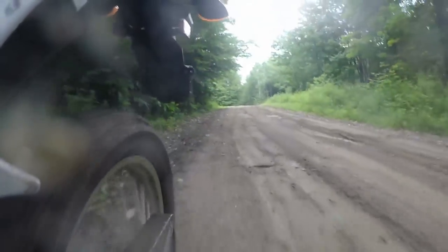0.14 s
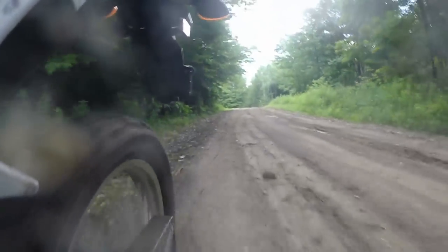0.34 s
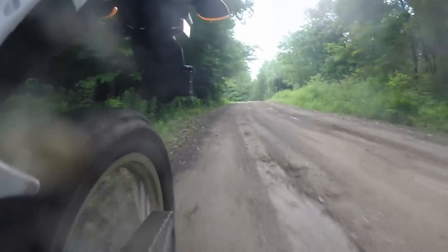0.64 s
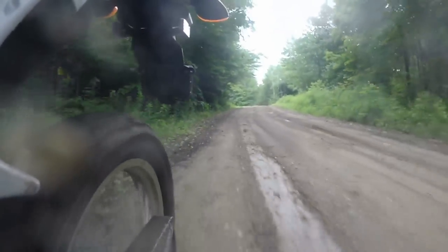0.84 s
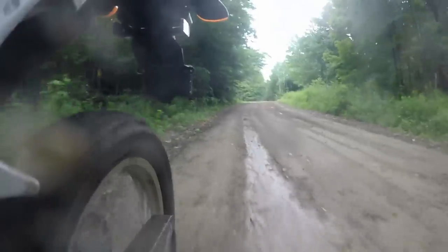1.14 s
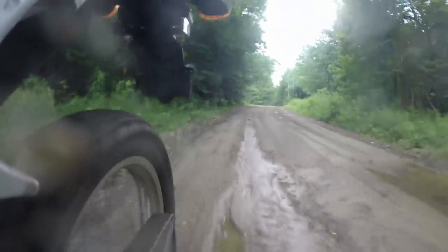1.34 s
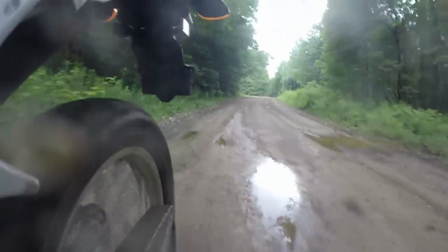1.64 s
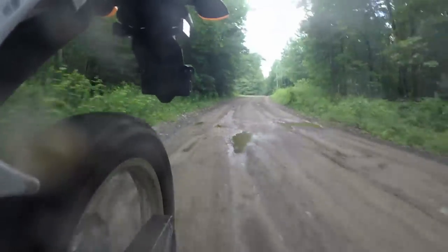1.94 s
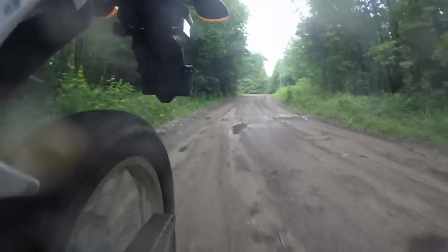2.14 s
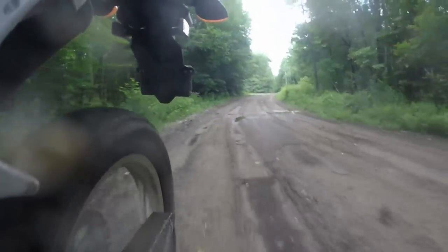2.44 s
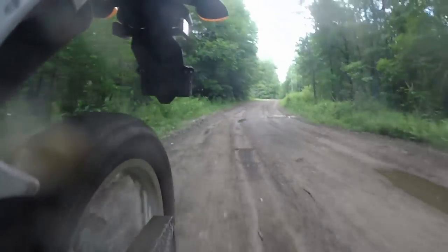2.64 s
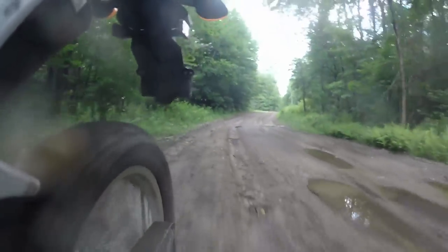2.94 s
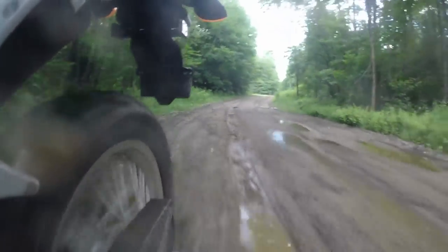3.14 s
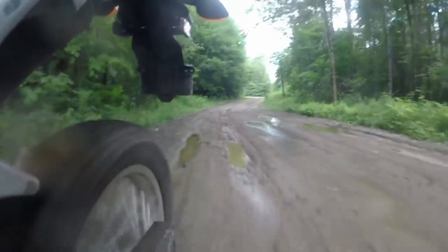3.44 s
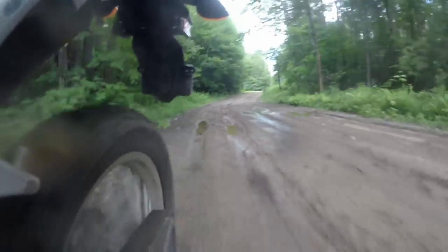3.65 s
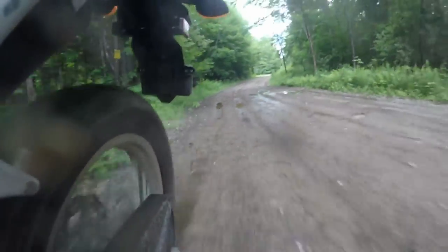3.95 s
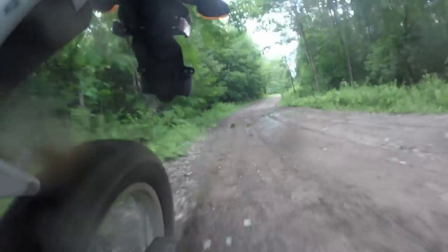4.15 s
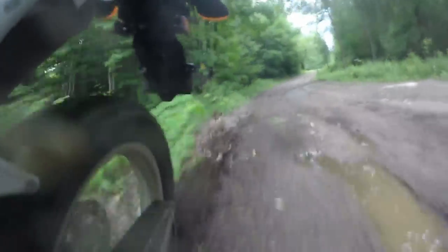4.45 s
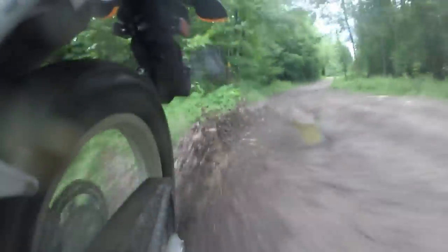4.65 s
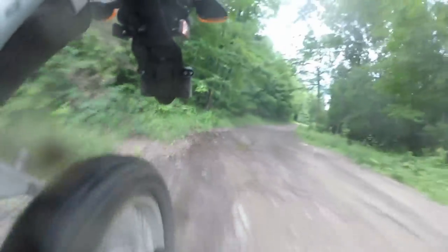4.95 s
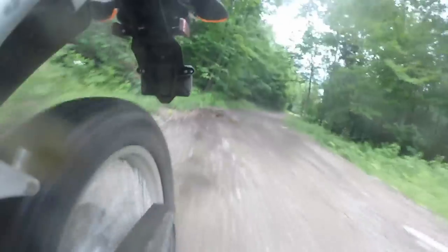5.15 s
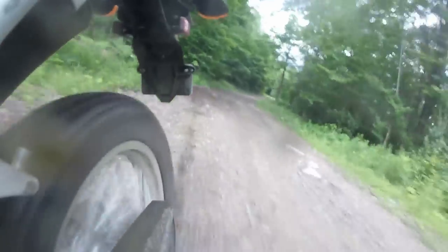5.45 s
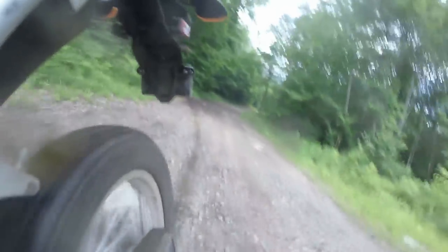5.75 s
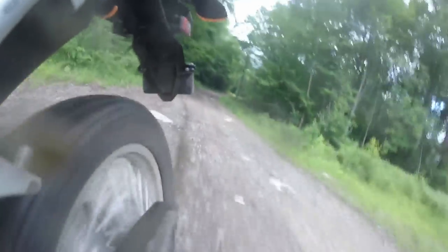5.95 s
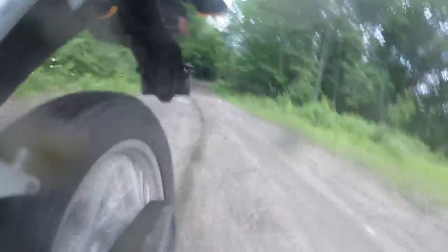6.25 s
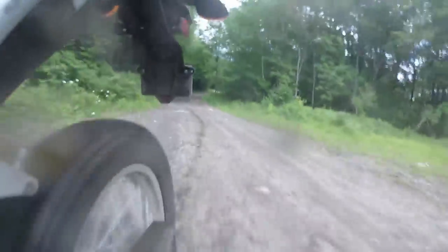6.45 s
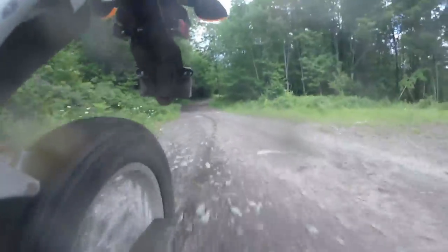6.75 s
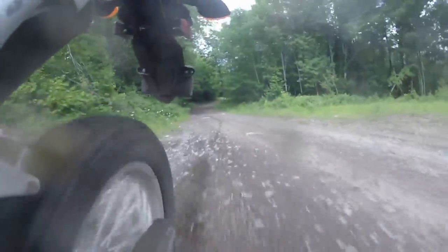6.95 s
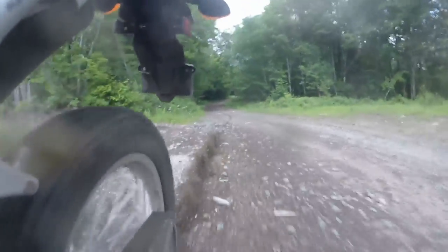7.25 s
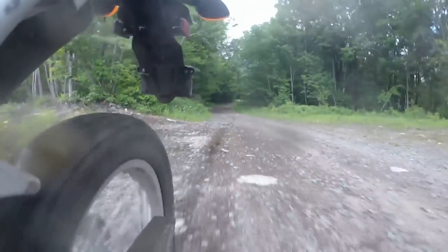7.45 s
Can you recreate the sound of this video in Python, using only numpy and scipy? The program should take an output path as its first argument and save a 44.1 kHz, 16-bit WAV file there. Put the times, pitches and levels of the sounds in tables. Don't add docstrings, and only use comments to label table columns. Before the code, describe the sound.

Continuous buzzy engine hum, conducted through the frame into a housed microphone, with dry metallic clatter and a raspy fairing. The pitch is level, edges upward, leaps in a brief wheelspin, falls back, then rises higher again before easing down. Bumps make the rattle swell; gravel ticks, tyre rumble and muffled wind gusts accompany it outdoors.

```python
import sys
import numpy as np
from scipy import signal
from scipy.fft import rfft, irfft, next_fast_len
from scipy.io import wavfile
from scipy.ndimage import uniform_filter1d, map_coordinates

SR = 44100
rng = np.random.default_rng(int(sys.argv[2]) if len(sys.argv) > 2 else 0)


def unload_wav(signal):
    wavfile.write(
        sys.argv[1],
        SR,
        np.round(np.clip(np.atleast_2d(signal).T, -1, 1) * 32767).astype(np.int16),
    )


def how_loud(loudness_db):
    steps = np.asarray(loudness_db, float) / 20
    return 10 ** steps


N = 335160

# time in seconds, speed in turns per second.
CRUISE_SPEED = [(0, 37.87), (.75, 37.3), (1, 36.33), (1.37, 36), (1.46, 37.42), (1.95, 37.68), (2.86, 39),
                (3.15, 41.58), (3.79, 41.5), (4.1, 44.22), (4.13, 48.15), (4.23, 51), (4.8, 41.93),
                (5.14, 42.11), (5.24, 50.82), (5.62, 52.44), (6.5, 50.2), (6.95, 45.81)]
# start in seconds, length in seconds, rise in turns per second.
WHEEL_SURGES = [(0.141, .31, -1.75), (.25, .14, -1.54), (1.393, 0.1792, 0.88), (3.25, 0.1886, -1),
                (3.423, 0.1988, 0.6), (3.823, .21, 2.5), (4.229, .55, 20.5), (5.262, .19, -3),
                (5.68, .79, 12), (5.987, 0.1504, -2), (6.501, .45, 2.4), (6.982, .49, -2.5),
                (7.52, 0.27, 0.5)]
# time in seconds, clatter level in dB, extra exhaust in dB.
ENGINE_LOAD = [(0, -26.5, 0.5), (1.4, -26, 1.5), (1.75, -29, 3), (2.5, -26.5, 2), (3.3, -26, 0.5),
               (3.66, -29, 1), (4.3, -26.5, 2), (4.46, -23.5, -1), (4.61, -24, 2.5), (4.7, -35.5, -3),
               (4.85, -25.5, -1), (5.5, -27, 1.5), (5.78, -30.5, 2), (5.97, -22.5, 2), (6.23, -23, 3),
               (6.33, -35, 4), (6.6, -28.5, -1), (7.6, -23.5, -2)]
# time in seconds, half width in seconds, gain in dB, extra treble in dB.
JOLTS = [(.17, 0.17, -1, 0.5), (.37, 0.044, 1, 0.5), (.93, 0.026, 0.5, 2), (1.04, 0.094, -0.5, -1.5),
         (1.42, 0.043, 1, -1), (1.66, .03, 3, 2.5), (2.18, 0.05, 1, 1), (2.67, 0.097, -2.5, 0.5),
         (2.75, 0.065, 1.5, 0), (2.88, 0.085, -1, -1), (3.05, 0.028, 0.5, 0), (3.16, .04, 0, 1),
         (3.31, 0.046, 0.5, -0.5), (3.42, 0.13, 1, 1.5), (3.83, 0.08, 2, 2), (3.97, 0.084, 3, 2.5),
         (4.16, 0.085, 4.5, 2), (4.45, 0.074, 0, 6), (4.74, 0.058, 3, -4), (5.1, 0.064, 0.5, 3.5),
         (5.22, .06, 4.5, 0.5), (5.27, 0.039, -2, -1), (5.44, .04, 3, 0.5), (5.63, 0.087, 0, 1.5),
         (6.42, 0.055, -2.5, 0.5), (6.99, 0.14, 5, 1.5), (7.1, 0.032, 2.5, 0.5), (7.27, .08, -2.5, 1),
         (6.08, 0.051, 1, -0.5), (6.52, 0.044, 1.5, 0.5)]
# speed in turns per second,
# then the level in dB of crank orders 2, 3, 4, 6 and 5.
MOUNT_ORDERS = [(32.7, -33, -26, -17, -15, -31), (35.9, -41, -18, -18.5, -24, -19.5),
                (37.3, -45, -14, -35, -20, -24.5), (39, -51, -14, -21, -20.5, -31),
                (41.5, -39, -28.5, -13, -27, -31), (46.6, -26.5, -28.5, -16.5, -23, -25),
                (47.6, -21.5, -39, -16.5, -27.5, -33.5), (51.8, -19, -30, -15, -38, -35),
                (56, -13.5, -34.5, -20, -30.5, -41), (60.5, -15, -28.5, -20.5, -27.5, -31),
                (66.2, -20.5, -19.5, -22, -26.5, -34)]
# time in seconds, half width in seconds,
# change of even orders in dB, change of odd orders in dB.
FRAME_TWISTS = [(.01, 0.025, 16, -2), (3, 0.025, -6, 1), (3.94, 0.026, -4.5, 9.5), (4.09, 0.065, -1, 7),
                (4.42, 0.06, -0.5, -3), (4.64, 0.019, 0, -8), (4.721, 0.027, -19, -18),
                (5.12, 0.074, 2.5, 6.5), (5.22, 0.023, -8, 10), (5.33, 0.066, -9.5, -3),
                (5.52, 0.049, -2, -17), (5.86, 0.12, -2.5, -3), (5.97, .05, -1, 5), (6.12, 0.028, -10, 8.5),
                (6.24, 0.022, -1, -11), (6.49, 0.054, -3.5, -12), (6.95, 0.1, -5, 3), (5.27, 0.052, 5, 6),
                (3.08, 0.046, 4, 8), (4.95, 0.051, 1, -1)]
# time in seconds, 6th order in dB, 3rd and 5th in dB, gear whine in dB.
FAIRING_SEAT = [(0, 1.5, -1.5, 0), (1.4, 1.5, 0, 0), (1.55, -8, -1, 0), (2.9, -3.5, 2, -15),
                (3.6, -3.5, 5, -3), (4.1, 0, 2, 2.5), (6.4, -3, 2.5, -6), (6.8, 5, -7, 9.5),
                (7.1, -1, -3, -0.5), (7.6, -1, 1, 4)]
# speed in turns per second, odd orders in dB,
# multiples of three in dB, multiples of four in dB, 16-tooth gear in dB, fairing rasp in dB.
UPPER_ORDERS = [(36, 7, 0, 8, 5, -5), (35.9, 7.5, -1.5, 9.5, -21, -9.5), (39, 1.5, -4.5, -0.5, -24, -8),
                (41.36, 2.5, -1, 8, 5, -5), (43.6, -9.5, 5, -12, 17.5, -9.5),
                (48.2, -9.5, 5.5, -5.5, 0.5, -3.5), (51, 2, 6.5, 3, 6, -4.5), (59, 5.5, 2, 5, -9, -10),
                (66, 5.5, -4.5, 12, -8, -3), (65.6, 0, -6, -8, -2, 1)]
# frequency in Hz, level in dB.
PIPE_TONE = [(240, 3.5), (310, -8.5), (350, -2.5), (410, 2.5), (450, -7.5), (500, -5.5), (560, -6.5),
             (620, -12.5), (700, -9.5), (800, -16), (1000, -31), (1600, -15)]
# frequency in Hz, level in dB.
KNOCK_TONE = [(500, -33), (900, -3), (1500, -1.5), (3200, -12.5), (4500, -23), (8000, -47), (14000, -60)]
# time in seconds, peak level in dB.
STONES = [
    (1.595, -13),
    (4.279, -8),
    (5.852, -13),
]
# place in the cycle 0-1, width in the cycle 0-1, level in dB.
STROKES = [
    (.0, .02, 0),
    (.13, .015, -4),
    (.26, .015, -2),
    (.38, .015, -4),
    (.5, .02, -1),
    (.63, .015, -4),
    (.76, .015, -2),
    (.88, .015, -4),
]
# frequency in Hz, width in Hz, level in dB.
CASING_MODES = [(1010, 127, -8.5), (1199, 37, -1.5), (1332.5, 50.4, 0), (1581, 134, -2.5),
                (1744, 140, -8.5), (1987, 152, -9), (2400, 49, -11.5), (2505, 112, -11.5),
                (3137, 123, -9.5)]
# frequency in Hz, level in dB.
FAIRING_TONE = [(500, 2), (800, -3.5), (1300, -13), (2100, -1), (2600, -7.5), (3400, -23), (4500, -22.5),
                (7000, -69.5)]
# frequency in Hz, level in dB.
VALVE_TONE = [(2000, -14), (3300, 0), (3610, -3), (4400, -9.5), (4660, -7), (5060, -12), (5790, -6),
              (6410, -13), (7240, -13.5), (8540, -22), (10000, -32)]
# frequency in Hz, level in dB.
EDGE_TONE = [(6000, -36), (8500, -3.5), (10300, -2.5), (11200, -1), (12800, -3), (13600, -11),
             (15300, -14.5)]
# time in seconds, treble share in dB.
GRAVEL_LOOSENESS = [(0, -16), (1.7, -15), (2.5, -13), (4.3, -13), (4.9, -15.5), (6.3, -14.5), (7.6, -16.5)]
# frequency in Hz, level in dB.
TYRE_TONE = [(40, -40), (70, -14), (110, -5.5), (200, -5.5), (300, -13.5), (420, -12.5), (700, -14),
             (900, -20.5), (1300, -87)]
# frequency in Hz, level in dB.
WIND_TONE = [(12, -27), (22, -5), (28, 2), (33, 26), (40, 9), (50, 9), (90, -69)]
# time in seconds, gain in dB.
GUSTS = [(.3, 15), (.67, 3), (1.08, 8), (1.44, 14), (1.7, 10), (2, 8), (2.3, 4), (2.55, 5), (2.82, 5),
         (3.07, 9), (3.4, 4), (3.7, 6), (3.97, 12), (4.6, 1), (5.02, 12), (5.42, 7), (5.62, -1), (5.97, 8),
         (6.2, 11), (6.63, 9), (6.9, 6), (7.07, 3), (7.24, 10), (7.58, 7)]

EXHAUST_DB, EXHAUST_FALL_DB = 7.5, 0.16
EXHAUST_JOLT = 0.69
BRIGHT_FALL = 0.055
KNOCK_DB, KNOCK_SCATTER_DB, STONE_DB = -9.5, 2.2, 17
KNOCK_PLACE = 0
CALM_DB, GUST_S = -37.5, 0.097


def unit(x):
    return x / np.sqrt(np.mean(x ** 2) + 1e-20)


def along(points, hz):
    f, v = np.transpose(points)
    return np.interp(np.log(hz + 1), np.log(f + 1), v)


def curves(rows, at=None):
    where = np.arange(N) / SR if at is None else at
    start, *columns = np.transpose(rows)
    return [np.interp(where, start, column) for column in columns]


def wobble(rate):
    knots = rng.standard_normal(int(N * rate / SR) + 4)
    return map_coordinates(knots, [np.arange(N) * rate / SR])


def filtered(x, response):
    m = next_fast_len(N + SR // 2)
    spectrum = rfft(x, m) * response(np.fft.rfftfreq(m, 1 / SR))
    return unit(irfft(spectrum, m)[:N])


def coloured(x, spectrum):
    return filtered(x, lambda hz: how_loud(along(spectrum, hz)))


def slow_times():
    return np.arange(0, N / SR + .002, .001)


def swells(rows):
    t = slow_times()
    total = sum(height * np.exp(-2 * ((t - s) / width) ** 2) for s, width, height in rows)
    return curves(np.transpose([t, total]))[0]


def revs():
    t = slow_times()
    spin = 0
    for s, length, rise in WHEEL_SURGES:
        u = (t - s) / length
        spin = spin + rise * 4 * np.clip(u, 0, 1) * np.clip(1 - u, 0, 1)
    return curves(CRUISE_SPEED)[0] + curves(np.transpose([t, spin]))[0]


def turns():
    return np.cumsum(revs()) / SR + .004 * wobble(20)


def load(jolt_share=1):
    return curves(ENGINE_LOAD)[0] + jolt_share * swells([row[:3] for row in JOLTS])


def pipe_db():
    level_db = load(1 + EXHAUST_JOLT) + curves(ENGINE_LOAD)[1] + EXHAUST_DB
    return level_db - EXHAUST_FALL_DB * (revs() - 37)


def orders(angle):
    even_db = swells([(s, width, even) for s, width, even, _ in FRAME_TWISTS])
    odd_db = swells([(s, width, odd) for s, width, _, odd in FRAME_TWISTS])
    sixth_db, seat_db, _ = curves(FAIRING_SEAT)
    changes = (even_db, odd_db + seat_db, even_db, odd_db / 2 + sixth_db, odd_db / 2 + seat_db)
    lags = (.6, 0, 3, .5, -.5)
    total = 0
    for k, lag, db, change_db in zip((2, 3, 4, 6, 5), lags, curves(MOUNT_ORDERS, revs()), changes):
        size = np.sqrt(2) * how_loud(db + change_db + 0.95 * wobble(16))
        total = total + size * np.cos(2 * np.pi * k * angle + lag)
    return total


def exhaust(angle):
    speed = revs()
    odd_db, threes_db, fours_db, gear_db, _ = curves(UPPER_ORDERS, speed)
    gear_db = gear_db + curves(FAIRING_SEAT)[2]
    tone, power = 0, 0
    for k in range(7, 30):
        level_db = k % 2 * odd_db + (k % 3 == 0) * threes_db
        level_db = level_db + (k % 4 == 0) * fours_db + (k == 16) * gear_db
        size = how_loud(along(PIPE_TONE, k * speed) + level_db + 1.5 * wobble(6))
        spread = .02 * (k - 10) ** 2 + 1.1 * wobble(2)
        tone = tone + size * np.cos(2 * np.pi * k * angle - spread)
        power = power + size ** 2 / 2
    alternate = 1 + 0.09 * np.cos(np.pi * angle)
    return how_loud(pipe_db() - 5.17) * alternate * tone / np.sqrt(power)


def firing(angle):
    blows = np.zeros(N)
    at = np.flatnonzero(np.diff(np.floor(angle - KNOCK_PLACE)) > 0)
    blows[at] = -how_loud(KNOCK_SCATTER_DB * rng.standard_normal(500)[:len(at)])
    for s, db in STONES:
        blows[round(s * SR)] = how_loud(db + STONE_DB)
    return how_loud(load() + KNOCK_DB) * coloured(blows, KNOCK_TONE)


def bursts(angle, scatter_db, rest_db):
    total = np.full(N, how_loud(rest_db))
    for place, width, db in STROKES:
        cycle, since = np.divmod(angle / 2 - place + 1.5, 1)
        draws = np.tanh(rng.standard_normal((2, int(cycle.max()) + 1)))
        size, late = draws[:, cycle.astype(int)]
        distance = np.abs(since - .5 - 0.043 * late)
        total += how_loud(db + scatter_db * size) * np.exp(-distance / width)
    return total


def ticks():
    t = np.arange(N) / SR
    return sum(how_loud(db + 16) * (t > s) * np.exp(-np.abs(t - s) / .004) for s, db in STONES)


def resonance(f, centre, width):
    return 1j * f * width / (centre ** 2 - f * f + 1j * f * width)


def casing(f):
    modes = sum((-1) ** k * how_loud(db) * resonance(f, centre, width)
                for k, (centre, width, db) in enumerate(CASING_MODES))
    return modes / (1 + (800 / (f + 1)) ** 6) / (1 + (f / 3800) ** 6)


def side_cover(angle, shake):
    speed, pitch = revs(), 1352
    free = filtered(shake, lambda f: resonance(f, pitch, 40))
    locked = np.exp(-((30 * speed - pitch) / 45) ** 2) * np.cos(2 * np.pi * 30 * angle)
    return how_loud(-25.0) * np.clip((speed - 42) / 5, 0, 1) * (free + 2.2 * locked)


def clatter(angle):
    speed = revs()
    level_db = load() + 1.13 * wobble(14)
    spray_db = swells([(s, width, treble) for s, width, _, treble in JOLTS])
    bright_db = curves(GRAVEL_LOOSENESS)[0] + spray_db - BRIGHT_FALL * (level_db + 33.5)
    bright_db = bright_db + 0.4 * wobble(12)
    bright_db = bright_db + 0.25 * np.clip(speed - 55, 0, 9)

    knocks = bursts(angle, scatter_db=9.0, rest_db=-6.5)
    shake = (knocks ** 0.64 + ticks()) * rng.standard_normal(N)
    teeth = np.interp(angle % 1, np.linspace(0, 1, 240), rng.standard_normal(240))
    meshing = unit(shake) + .33 * unit(teeth) * how_loud(2.5 * wobble(5))
    ring = filtered(meshing, casing) + side_cover(angle, shake)

    rasp_db = curves(UPPER_ORDERS, speed)[4] + 1.4 * spray_db
    rasp = how_loud(rasp_db) * coloured(shake, FAIRING_TONE)
    gravel = how_loud(0.39 * wobble(24))
    rustle = coloured(knocks ** 0.74 * gravel * rng.standard_normal(N), VALVE_TONE)
    edge = coloured(knocks * gravel * rng.standard_normal(N), EDGE_TONE)
    treble = how_loud(bright_db + 1.5) * (rustle + how_loud(-15.5) * edge)
    return how_loud(level_db) * (how_loud(0.5) * ring + rasp + treble)


def tyre():
    roar_db = uniform_filter1d(pipe_db(), size=SR // 20) - 9.5
    return how_loud(roar_db + 0.23 * wobble(23.0)) * coloured(rng.standard_normal(N), TYRE_TONE)


def wind():
    thump = coloured(rng.standard_normal(N), WIND_TONE)
    recent_power = np.abs(uniform_filter1d(thump ** 2, size=SR // 12))
    steady = thump / np.sqrt(recent_power + 0.044)
    gust_db = swells([(s, 2 * GUST_S, db) for s, db in GUSTS])
    return how_loud(CALM_DB + gust_db + 1.6 * wobble(9)) * steady


def scene():
    angle = turns()
    engine = orders(angle) + exhaust(angle) + firing(angle) + clatter(angle)
    return (engine + tyre() + wind())[None]


def top_cut(x):
    return signal.sosfilt(signal.butter(12, 15330, fs=SR, output="sos"), x)


def record(dry):
    held = dry / (1 + np.abs(dry / 0.88) ** 4) ** (1 / 4)
    return top_cut(held)


dry = scene()
out = record(dry)
unload_wav(out)
```